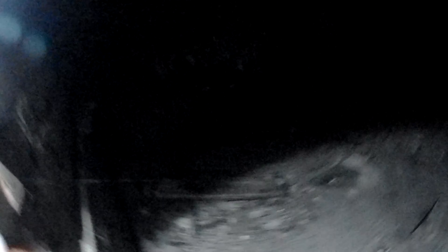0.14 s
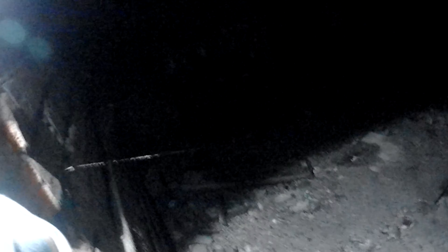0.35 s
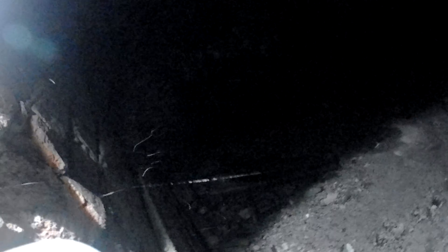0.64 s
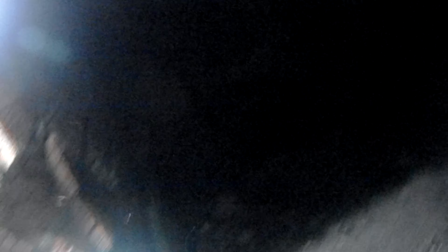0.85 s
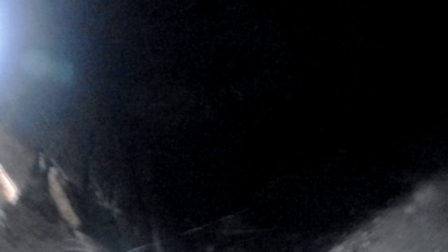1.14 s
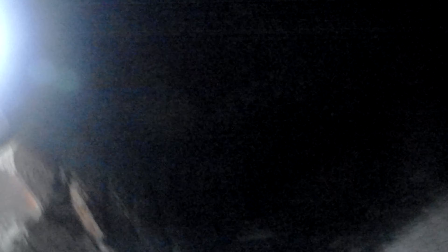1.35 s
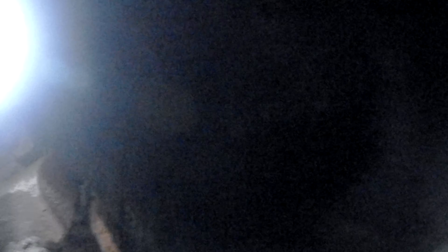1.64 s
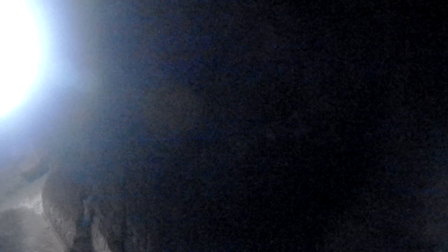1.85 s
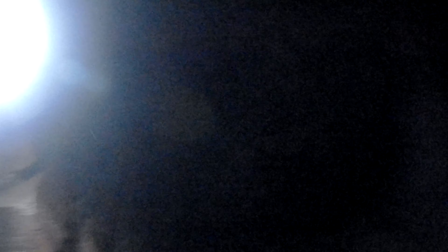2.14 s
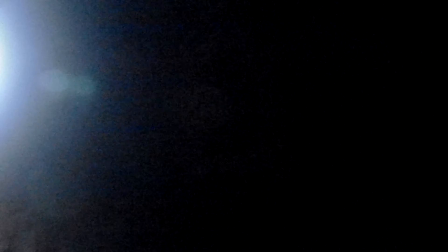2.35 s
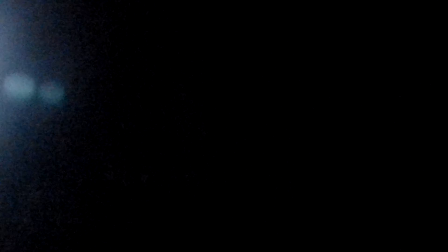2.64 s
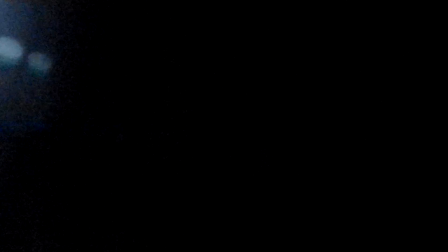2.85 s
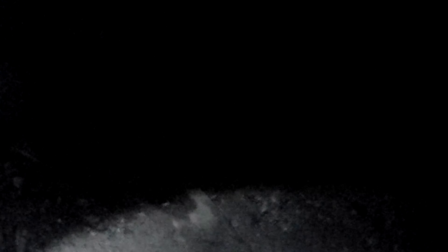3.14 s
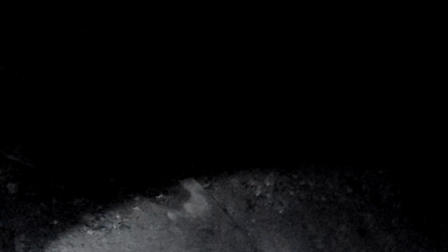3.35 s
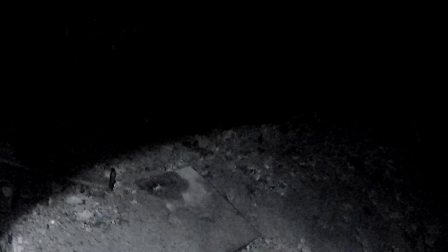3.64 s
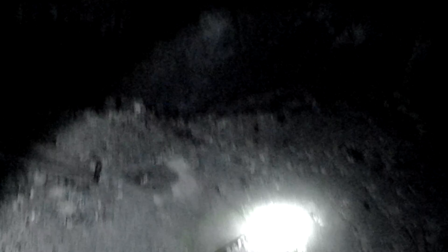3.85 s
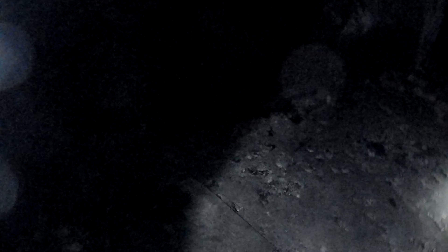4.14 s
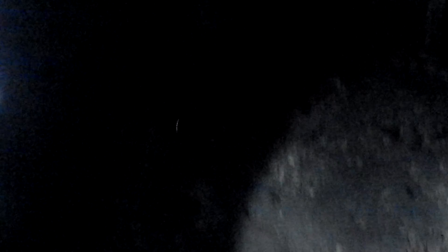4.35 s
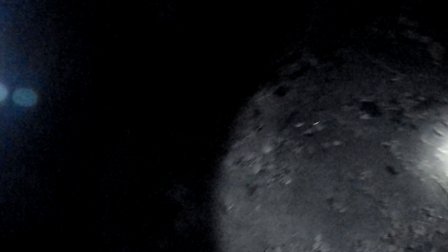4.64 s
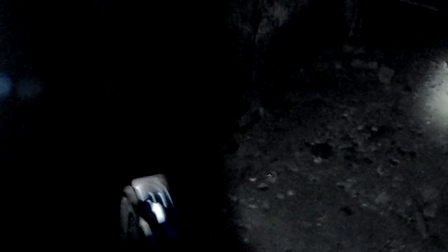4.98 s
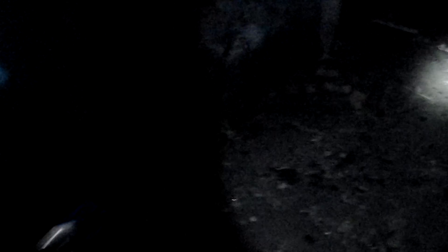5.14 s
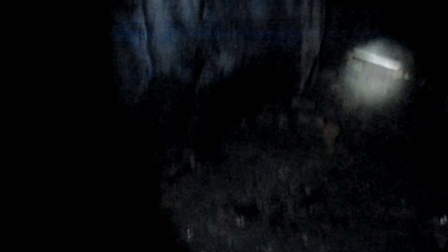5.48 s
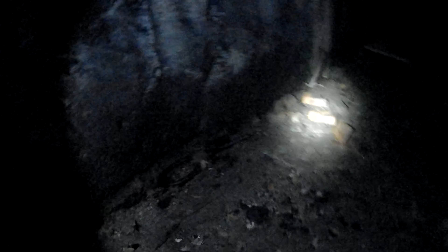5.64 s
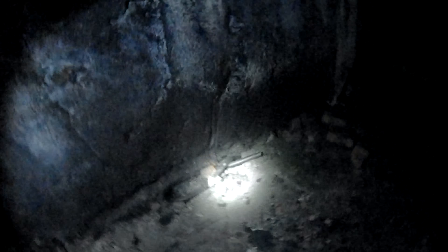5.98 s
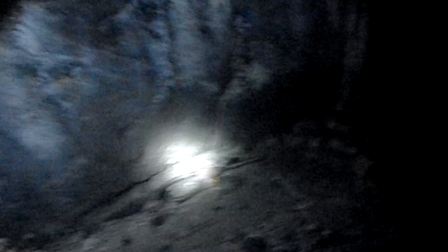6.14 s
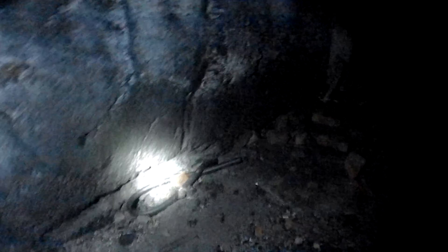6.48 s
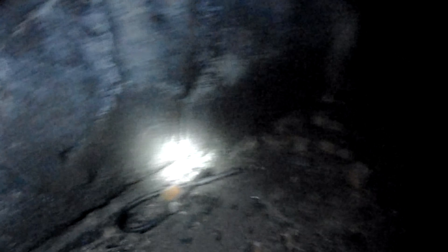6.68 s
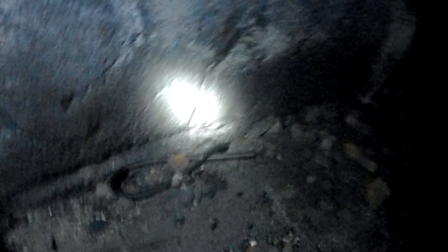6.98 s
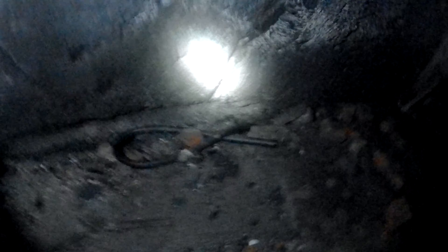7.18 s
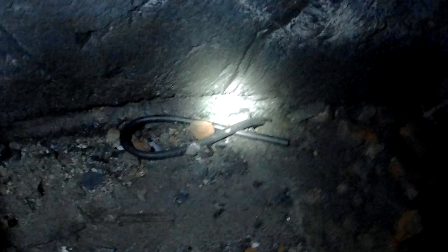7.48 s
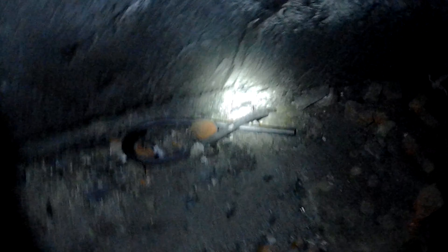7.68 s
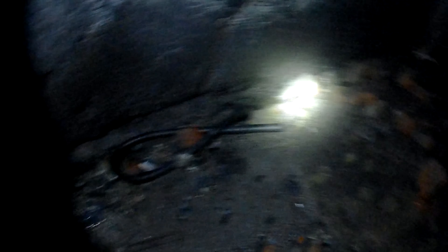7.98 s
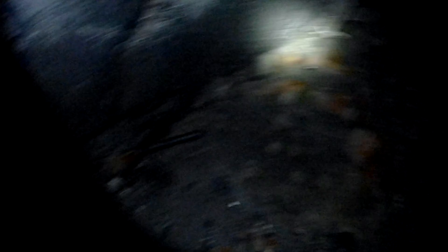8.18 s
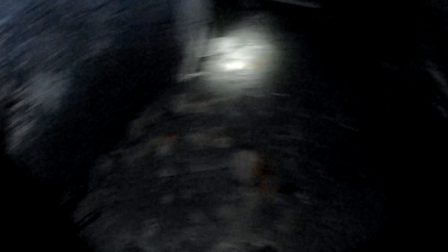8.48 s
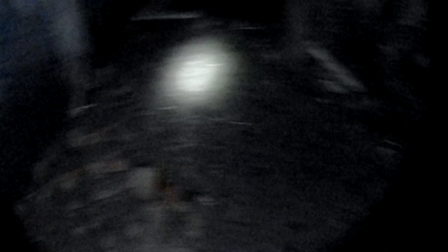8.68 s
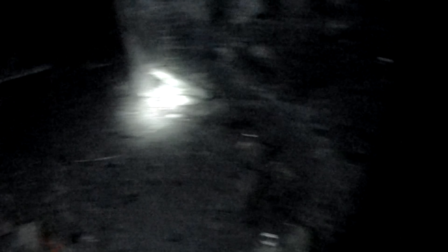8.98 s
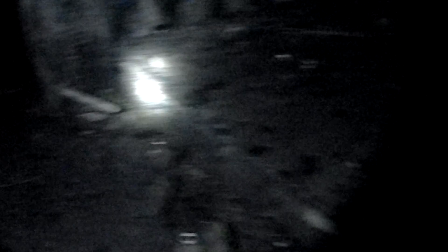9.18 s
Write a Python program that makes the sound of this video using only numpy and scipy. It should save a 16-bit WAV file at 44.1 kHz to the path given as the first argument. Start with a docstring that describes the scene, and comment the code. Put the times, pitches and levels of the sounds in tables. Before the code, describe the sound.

In a large tunnel, near silence with low rumble and soft hiss gives way to a distant stone rattle. Then someone steps about on loose rubble close to a small microphone: light scuffs, a sudden loud hard stone clack, a cluster of crunches and knocks, gritty scrapes, one more sharp knock, and lighter scuffs fading out.

```python
"""Someone shifts and steps about on loose rock rubble in a large tunnel, close to a small microphone.
Each scuff is a dense run of tiny stick-slip impulses that rings stones of every size, sprays grit and dust,
and thuds through the sole. Short stony rasps and knocks add their own pitches, single stones snap and a slab
rings as damped modes; farther off, free stones rattle. The tunnel adds quick reflections and a diffuse tail,
over filtered noise for a low rumble and a soft high hiss that follow the movement."""
import sys
import numpy as np
from scipy import signal
from scipy.fft import rfft, irfft, next_fast_len
from scipy.io import wavfile

SR = 44100
rng = np.random.default_rng(int(sys.argv[2]) if len(sys.argv) > 2 else 0)


def file_out(sig):
    """Save sig as 16-bit WAV at sys.argv[1]."""
    # one column per channel
    cols = np.atleast_2d(sig).T
    # limit, then scale
    lim = np.clip(cols, -1, 1)
    pcm = np.round(lim * 32767).astype(np.int16)
    wavfile.write(sys.argv[1], SR, pcm)


N = 410913
TIME = np.arange(N) / SR

# Resonances of big hollow-sounding blocks: (frequency [Hz], width [Hz], relative level [dB])
HOLLOW_MODES = [(433.4, 41, 0.5), (627, 134, 4.5), (882, 280, -0.5)]
# Resonances of middling stones: (frequency [Hz], width [Hz], relative level [dB])
CLATTER_MODES = [(1031, 58, 0), (1376, 111, 2.5), (1605, 178, 2), (1780, 127, 2.5), (2060, 200, -6.5)]
# Upper resonances of ringing stone: (frequency [Hz], width [Hz], relative level [dB])
OVERTONE_MODES = [(3000, 490, -11), (3807, 88, -0.5), (4540, 190, -12), (5300, 150, -31), (5810, 40, -14),
                  (7970, 1000, -21.5)]


def from_db(db):
    """Amplitude gain is the antilogarithm of a level: 20 dB for each factor of ten."""
    return 10 ** (np.asarray(db) / 20)


def rms_one(x):
    """Dividing by the root mean square gives a signal unit power."""
    return x / np.sqrt(np.mean(x ** 2) + 1e-20)


def coloured(x, spectrum):
    """Spectral shaping: multiply the Fourier transform by a gain of unit mean power, so white noise keeps its power."""
    size = next_fast_len(N)
    hz, db = np.transpose(spectrum)
    bins_hz = np.fft.rfftfreq(size, 1 / SR)
    gain = from_db(np.interp(np.log(bins_hz + 1), np.log(hz), db))
    return irfft(rfft(x, size) * rms_one(gain), size)[:N]


def passed(x, hz, kind, order=2):
    """Butterworth filtering: the passband is maximally flat."""
    edges = np.clip(hz, 10, SR * .45)
    sections = signal.butter(order, edges, kind, fs=SR, output="sos")
    return signal.sosfilt(sections, x + 1e-18)


def resonate(x, modes, edges_hz):
    """Modal superposition: parallel two-pole resonances of alternating sign, confined to a band."""
    out = 0
    for k, (hz, width, db) in enumerate(modes):
        r = np.exp(-np.pi * width / SR)  # bandwidth sets the damping
        poles = [1, -2 * r * np.cos(2 * np.pi * hz / SR), r * r]
        mode = signal.lfilter([1 - r, 0, r - 1], poles, x + 1e-18)
        out = out + (-1) ** k * from_db(db) * mode
    return passed(out, edges_hz, "band")


def rubbed(x, modes, edges_hz):
    """Steady excitation: unit energy in the impulse response lets a white drive keep its power."""
    response = resonate(signal.unit_impulse(SR // 10), modes, edges_hz)
    return resonate(x, modes, edges_hz) / np.linalg.norm(response)


def struck(x, modes, edges_hz):
    """Impulsive excitation: unit peak in the impulse response lets a single click keep its height."""
    response = resonate(signal.unit_impulse(SR // 10), modes, edges_hz)
    return resonate(x, modes, edges_hz) / np.abs(response).max()


def damped_sine(x, hz, r):
    """A lightly damped mode answers an impulse with a sine that shrinks by r at each sample."""
    w = 2 * np.pi * hz / SR
    return signal.lfilter([0, np.sin(w)], [1, -2 * r * np.cos(w), r * r], x + 1e-18)


def impulses(times, db):
    """A brief blow is idealised as one impulse of the given level."""
    out = np.zeros(N)
    out[np.round(times * SR).astype(int)] = from_db(db)
    return out


def hold(start, length, swell, fade):
    """Contact strength rises exponentially, holds and relaxes exponentially; returned with its span of samples."""
    near = slice(max(int((start - .2) * SR), 0), int((start + length + .3) * SR))
    early = np.maximum(start - TIME[near], 0)
    late = np.maximum(TIME[near] - start - length, 0)
    return near, np.exp(-early / swell - late / fade)


def scuffs(thud_db=-2.5, hollow_db=-7.0, clatter_db=-5.0, grit_db=-5.5, chip_db=-8.0,
           overtone_db=-6.5, dust_db=-1.0, creep_db=-0.9, creep_grit_db=-8):
    """Stick-slip friction: the sole slips in judders, and the slips drive stones of every size."""
    judder_db, judder_hz = 2, 151  # depth per unit of lurch, upper limit of its noise
    # Resonances of grit: (frequency [Hz], width [Hz], relative level [dB])
    grit_modes = [(2397, 250, 2.5), (3324, 146, -2), (3710, 620, 2), (4260, 1050, -2), (5300, 115, -3.5),
                  (6260, 660, -14), (7400, 680, -16)]
    # Spectrum of the thud through the sole: (frequency [Hz], relative level [dB])
    thud_spectrum = [(20, -22), (50, 2), (80, 3.5), (160, -3.5), (300, -5.5), (450, -9), (900, -17),
                     (3000, -70)]
    # Spectrum of the sprayed dust: (frequency [Hz], relative level [dB])
    dust_spectrum = [(1500, -13), (4000, 6), (6000, 0.5), (8500, 3.5), (11000, 4), (13200, 4), (15500, -4)]

    thud, hollow, clatter, grit, ring, dust = pressure()
    creep = from_db(creep_level() + creep_db)
    lurch = rms_one(passed(rng.standard_normal(N), judder_hz, "low"))
    judder = rms_one(from_db(judder_db * np.clip(lurch, -2, 2)))
    coarse, fine = judder * slips(), judder * slips()
    # creep and strokes add as powers
    loose = np.hypot(grit, creep * from_db(creep_grit_db))
    rolling = np.hypot(clatter, creep)

    out = from_db(thud_db) * coloured(thud * fine, thud_spectrum)
    out += from_db(hollow_db) * rubbed(hollow * judder * slips(), HOLLOW_MODES, edges_hz=(330, 1100))
    out += from_db(clatter_db) * rubbed(rolling * coarse, CLATTER_MODES, edges_hz=(850, 2400))
    out += from_db(grit_db) * rubbed(loose * fine, grit_modes, edges_hz=(2100, 9000))
    out += from_db(chip_db) * loose * chips()
    out += from_db(overtone_db) * rubbed(ring * coarse, OVERTONE_MODES, edges_hz=(2800, 9000))
    spray = coloured(dust * judder * rng.standard_normal(N), dust_spectrum)
    return out + from_db(dust_db) * spray


def pressure():
    """Independent contacts add in power: the root of the sum over all treads and slides drives each layer."""
    # The sole comes down on the stones: (start [s], length [s], clatter level [dB],
    # thud relative to clatter [dB], grit relative to clatter [dB])
    treads = [(2.814, .032, -60, -10, -3), (2.926, 0.01, -42, -4.5, -5.5), (3.008, 0.012, -51, -1.5, -1.5),
              (3.106, 0.023, -37.5, -4.5, -3.5), (4.028, 0.012, -26.5, -24, -12.5),
              (4.138, 0.0097, -33, -20, -20), (4.302, 0.026, -39.5, -10, -14),
              (4.527, 0.012, -28.5, -13, -31), (4.558, 0.025, -32, -4.5, -14), (4.586, 0.023, -41, -5, -8),
              (4.806, .024, -35, -10, -12.5), (5.051, 0.022, -55.5, -8, 0), (6.897, 0.014, -48, -7, -7),
              (6.995, 0.019, -47, -1, -5.5), (7.198, 0.02, -47.5, -1, -10), (7.236, 0.0049, -50, -5, -8),
              (8.176, 0.0068, -47.5, -4, -14), (8.233, 0.024, -46.5, -5.5, -13),
              (8.790, 0.0041, -35, -18, -7.5), (8.800, 0.018, -44, -11.5, -3.5)]
    # The sole drags over the stones: (start [s], length [s], clatter level [dB],
    # thud relative to clatter [dB], grit relative to clatter [dB])
    slides = [(.79, 0.044, -67, -5, -8.5), (2.14, .17, -69.5, -8, -2), (2.724, 0.0024, -48, 1, -0.5),
              (2.96, 0.049, -54.5, -5, -6.5), (3.21, 0.045, -57.5, -10, -3), (3.716, .016, -60, -14, -5.5),
              (3.853, 0.0055, -56.5, -34, -10), (4.015, 0.0028, -32, -11, -21),
              (4.211, 0.016, -46.5, -7, -12), (4.634, .014, -43, -15, -19), (4.659, 0.029, -43, -9.5, -5),
              (4.83, 0.045, -49, -8, -3.5), (5.15, 0.029, -53.5, -9, 1.5), (5.207, 0.053, -42.5, -16, -1),
              (5.28, 0.038, -50.5, -8, -1), (5.46, .026, -48.5, -2.5, -6), (5.557, 0.019, -40.5, -14, -5.5),
              (5.6, 0.12, -57.5, -8, -9), (5.85, 0.0091, -47.5, -9, -15.5), (5.945, 0.07, -53, -6, -6.5),
              (6.036, 0.019, -46, -10, -6), (6.207, .012, -40, -14, -7), (6.28, 0.031, -45, -18, -6),
              (6.423, .02, -47, -26, -4), (6.495, 0.018, -55, -11, -2.5), (6.744, 0.028, -48.5, -19, -7.5),
              (7.173, .045, -52.5, -4, -14), (7.47, 0.061, -73.5, 0, 6.5), (7.645, .04, -57.5, -4.5, -10.5),
              (7.803, 0.021, -59.5, -14, -5.5), (7.865, .012, -54.5, -13, -4),
              (8.202, 0.024, -48.5, -7, -12.5), (8.376, 0.043, -51.5, -3, -11.5), (8.5, 0.13, -67, -36, -6),
              (8.828, 0.024, -56.5, -5, -2.5)]
    power = strokes(treads, swell_s=0.0024, fade_s=0.0068, dust_db=-15, dust_loss=0.8)
    power += strokes(slides, swell_s=0.012, fade_s=0.013, dust_db=-14.5, dust_loss=0.17)
    return np.sqrt(power)


def strokes(rows, swell_s, fade_s, dust_db, dust_loss):
    """Contact loading: weight wakes big blocks, force rings them; louder strokes carry less dust for their level."""
    # an ordinary stroke: clatter level, then the others relative to clatter
    usual_db, usual_thud_db, usual_grit_db, usual_ring_db = -51, -5.5, -5.5, -18.5
    # departures from the ordinary, in dB per dB
    hollow_per_thud, hollow_loss_per_force, ring_per_force, dust_per_grit = 0.3, 0.14, 0.19, 0.65
    grip_per_force = 0.1  # a firm stroke stops sooner: dB of fade time lost per dB of force
    # loosened gravel settles: level relative to the stroke, fade, dB lost per dB of force
    settle_db, settle_fade_s, settle_loss = -10, 0.026, 0.54

    power = np.zeros((6, N))
    for start, length, db, thud, grit in rows:
        force = db - usual_db
        firm = max(force, 0)
        hollow = hollow_per_thud * (thud - usual_thud_db) - hollow_loss_per_force * force
        ring = usual_ring_db + ring_per_force * force
        dust = dust_db + dust_per_grit * (grit - usual_grit_db) - dust_loss * firm
        grip = from_db(-grip_per_force * firm)
        near, rubbing = hold(start, length, swell_s, fade_s * grip)
        _, loosened = hold(start, length, swell_s, settle_fade_s)
        settling = from_db(settle_db - settle_loss * firm) * loosened
        levels = from_db(db + np.array([thud, hollow, 0, grit, ring, dust]))
        power[:, near] += np.outer(levels, np.maximum(rubbing, settling)) ** 2
    return power


def creep_level():
    """Slow granular creep: the level [dB] of gravel shifting underfoot, interpolated at every sample."""
    # Creep of the loose gravel: (time [s], level [dB])
    creep_curve = [(0.0, -79), (2.57, -74.5), (3.09, -59.5), (3.35, -74), (3.68, -78), (4.07, -63),
                   (4.54, -73), (4.72, -63.5), (4.88, -65), (5.42, -60.5), (5.73, -71.5), (6.33, -60.5),
                   (6.56, -70.5), (7.03, -61.5), (7.26, -70), (8.1, -74.5), (8.33, -69.5), (9.32, -81.5)]
    s, db = np.transpose(creep_curve)
    return np.interp(TIME, s, db)


def slips():
    """Friction as shot noise: a dense random train of tiny slips of uneven size and either sign, at rms 1."""
    slips_per_s, spread_db = 3800, 3
    born = rng.random(N) < slips_per_s / SR
    sizes = from_db(spread_db * np.minimum(rng.exponential(1, N), 4))
    return rms_one(born * sizes * rng.choice([-1, 1], N))


def chips(per_s=900, lowest_hz=1900, highest_hz=7500, width_share=0.073, spread_db=6.0, count=24):
    """Random impacts on small bodies: each tick rings one of many damped modes; the sum has rms 1."""
    born = rng.random(N) < per_s / SR
    sizes = from_db(spread_db * np.minimum(rng.exponential(1, N), 3))
    ticks = born * sizes * rng.choice([-1, 1], N)
    dealt = rng.integers(0, count, N)  # which chip each tick falls to
    out = 0
    for k, hz in enumerate(np.geomspace(lowest_hz, highest_hz, count)):
        r = np.exp(-np.pi * width_share * hz / SR)
        out = out + lowest_hz / hz * damped_sine(ticks * (dealt == k), hz, r)
    return rms_one(out)


def pitched_bursts(swell_s=0.00022, fade_s=0.00092, width_share=0.086):
    """Resonant filtering of random impulses: each short stony rasp or knock excites a single mode."""
    # Short coloured bursts of stone, rasps and the ringing pitches of knocks:
    # (start [s], length [s], frequency [Hz], level [dB])
    bursts = [(1.704, 0.026, 1300, -65), (2.567, 0.0052, 1520, -67), (2.929, 0.0025, 2280, -39),
              (2.930, .0015, 4300, -45), (4.015, 0.029, 1410, -38), (4.527, 0.0049, 3700, -51),
              (4.555, 0.043, 3830, -55), (4.564, 0.013, 584, -37), (4.804, 0.023, 1050, -39),
              (4.809, 0.038, 1840, -42), (5.193, 0.074, 1850, -49), (5.457, .035, 830, -50.5),
              (5.553, .024, 4850, -48.5), (6.425, 0.026, 4800, -57.5), (6.984, 0.005, 704, -36),
              (6.984, .002, 1544, -28.5), (6.9849, 0.0011, 3850, -32.5), (8.182, 0.082, 1760, -58),
              (8.789, .007, 2360, -47), (8.790, 0.034, 5300, -60)]
    out, drive = np.zeros(N), slips()
    for start, length, hz, db in bursts:
        near, strength = hold(start, length, swell_s, fade_s)
        mode = [(hz, width_share * hz, 0)]
        ringing = rubbed(strength * drive[near], mode, edges_hz=(hz / 2, 1.92 * hz))
        out[near] += from_db(db) * ringing
    return out


def clicks(crack_s=0.001, crack_hz=(4500, 8500), hollow_db=-9, overtone_db=-8):
    """Impulsive release: a stone snaps from under the sole with a noise crack, and its modes ring freely."""
    # Single stones snapping: (time [s], body level [dB], crack level before filtering [dB])
    snaps = [(2.305, -61, -50), (2.637, -58, -47), (2.732, -40, -30.5), (2.813, -46.5, -42.5),
             (2.928, -31, -56), (3.011, -38.5, -35.5), (3.571, -55, -60), (3.942, -54, -57),
             (4.0324, -18, -33), (4.046, -26.5, -54), (4.129, -68, -47), (4.534, -27.5, -60),
             (4.5634, -36, -46), (4.576, -31, -50), (4.807, -28.5, -62), (5.054, -43, -50),
             (5.260, -43, -56), (6.9836, -27.5, -47), (7.236, -40.5, -54), (8.055, -55.5, -71),
             (8.242, -40.5, -55), (8.279, -42, -53)]
    s, body_db, crack_db = np.transpose(snaps)
    blows = impulses(s, body_db)
    body = struck(blows, CLATTER_MODES, edges_hz=(900, 2000))
    body += from_db(hollow_db) * struck(blows, HOLLOW_MODES, edges_hz=(350, 1000))
    ring = from_db(overtone_db) * struck(blows, OVERTONE_MODES, edges_hz=(2500, 8000))
    # each crack is noise under an exponential decay
    decay = np.exp(-1 / (crack_s * SR))
    burst = signal.lfilter([1], [1, -decay], impulses(s, crack_db) + 1e-18)
    crack = passed(burst * rng.standard_normal(N), crack_hz, "band", order=3)
    return body + ring + crack


def slab():
    """Free vibration of a plate: each tip of the loose slab sets its damped modes ringing."""
    # The slab tips: (time [s], level [dB])
    slab_tips = [(4.034, -31.5), (4.145, -46.5), (4.308, -41), (4.577, -40.5), (5.852, -42)]
    # Modes of the slab: (frequency [Hz], relative level [dB], time to decay by 60 dB [s])
    slab_modes = [(443.5, -5, 0.15), (794, -8, 0.11)]
    tips, out = impulses(*np.transpose(slab_tips)), 0
    for hz, db, t60 in slab_modes:
        r = np.exp(-np.log(1000) / (t60 * SR))
        out = out + from_db(db) * damped_sine(tips, hz, r)
    return out


def far_knocks(swell_s=0.00035, fade_s=0.00099):
    """Chattering contact: a quick rattle of random impulses excites the modes of free stones down the tunnel."""
    # Stones knocking and scraping: (start [s], length [s], level [dB])
    knocks = [(1.236, 0.0033, -45), (1.2381, 0.0071, -39.5), (1.25, 0.011, -58.5), (1.368, 0.011, -66)]
    # Resonances of those stones: (frequency [Hz], width [Hz], relative level [dB])
    far_modes = [(322, 210, -5.5), (690, 170, -3), (950, 160, -1.5), (1360, 200, 1.5), (1796, 137, 3.5),
                 (2550, 340, -12), (3800, 510, -17.5), (7200, 3900, -32.5)]
    contact = np.zeros(N)
    for start, length, db in knocks:
        near, strength = hold(start, length, swell_s, fade_s)
        contact[near] += from_db(db) * strength
    return rubbed(contact * slips(), far_modes, edges_hz=(130, 7000))


def tunnel(x, early_s=0.011, early_db=12, t60_s=0.39, cut_hz=17000):
    """Reverberation as decaying noise: quick reflections off the near wall, then a diffuse exponential tail."""
    t = TIME[:SR]
    tail = np.exp(-np.log(1000) * t / t60_s)
    early = from_db(early_db) * np.exp(-t / early_s)
    decay = tail + early
    arrived = t > .006  # nothing returns within the first 6 ms
    echo = passed(rng.standard_normal(SR) * decay * arrived, cut_hz, "low", order=1)
    return signal.fftconvolve(x, echo / np.linalg.norm(decay))[:N]


def background():
    """Filtered noise whose level follows the movement: a low rumble and a soft high hiss, perhaps clothing rustle."""
    # levels at the usual creep, and the swell in dB per dB of creep
    usual_creep_db, rumble_db, hiss_db, rumble_follows, hiss_follows = -71, -64, -79.5, 0.35, 0.37
    # Spectrum of the background rumble and hiss: (frequency [Hz], relative level [dB])
    background_spectrum = [(12, -29.5), (20, 5), (70, -11.5), (259, -14.5), (362, -16.5), (452, -17.5),
                           (565, -19.5), (985, -23.5), (1770, -29), (2210, -32), (2470, -31), (3000, -33),
                           (10800, -37.5), (12800, -32.5), (15500, -40)]
    stir = creep_level() - usual_creep_db
    noise = coloured(rng.standard_normal(N), background_spectrum)
    other_noise = coloured(rng.standard_normal(N), background_spectrum)
    # the levels refer to 25-300 Hz for the rumble and 9-15 kHz for the hiss
    low = passed(noise, 1010, "low") / np.std(passed(noise, (25, 300), "band", order=4))
    high = passed(other_noise, 1100, "high") / np.std(passed(noise, (9000, 15000), "band", order=4))
    rumble = from_db(rumble_db + rumble_follows * stir) * low
    hiss = from_db(hiss_db + hiss_follows * stir) * high
    return rumble + hiss


def scene():
    """Superposition: near feet and far stones, direct and through the tunnel's echo, over the background."""
    near_echo_db, far_echo_db = -29, -1.5
    near = scuffs() + pitched_bursts() + clicks() + slab()
    far = far_knocks()
    echo = tunnel(from_db(near_echo_db) * near + from_db(far_echo_db) * far)
    return (near + far + echo + background())[None]


def record(dry):
    """Band limiting: an elliptic low-pass cuts the top steeply above 15.55 kHz."""
    sections = signal.ellip(10, .2, 80, 15550, fs=SR, output="sos")
    return signal.sosfilt(sections, dry)


dry = scene()
out = record(dry)
file_out(out)
```